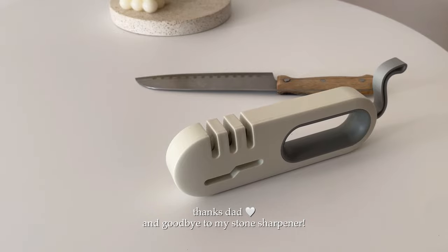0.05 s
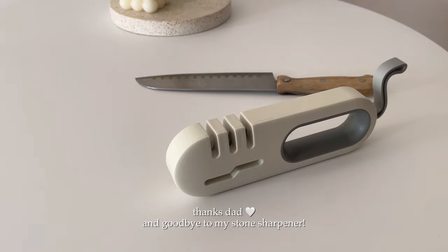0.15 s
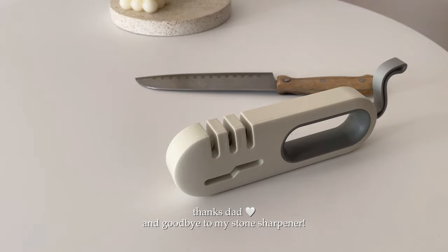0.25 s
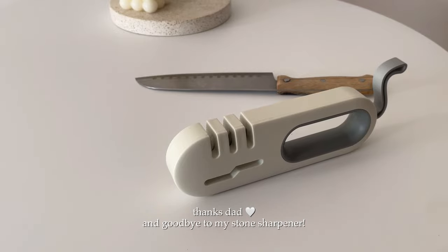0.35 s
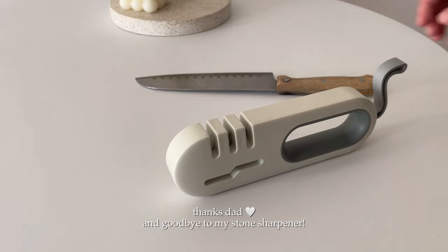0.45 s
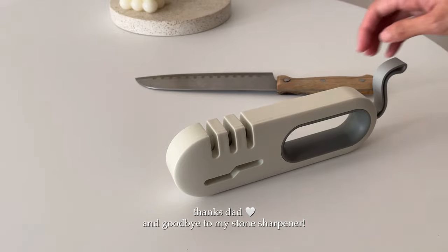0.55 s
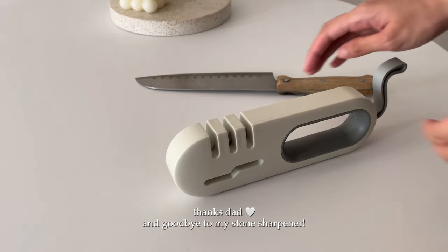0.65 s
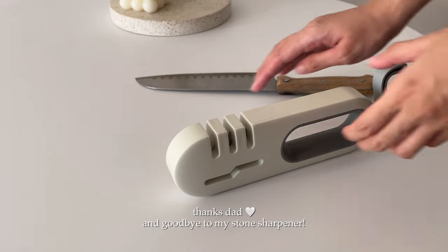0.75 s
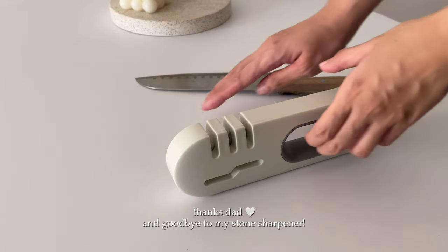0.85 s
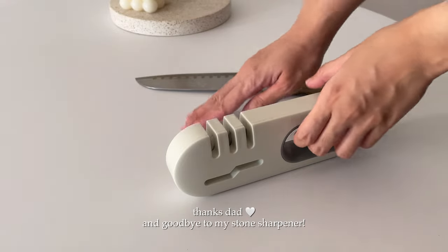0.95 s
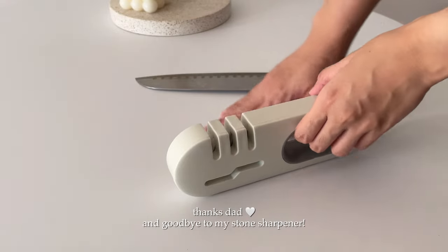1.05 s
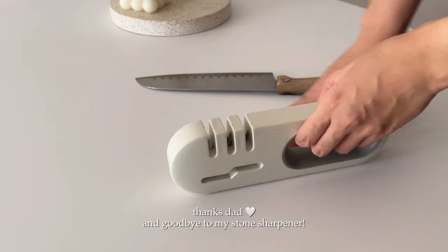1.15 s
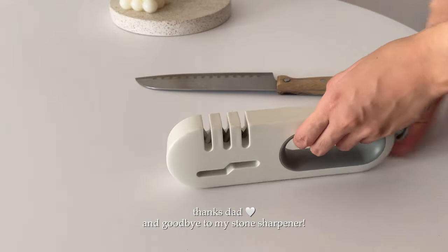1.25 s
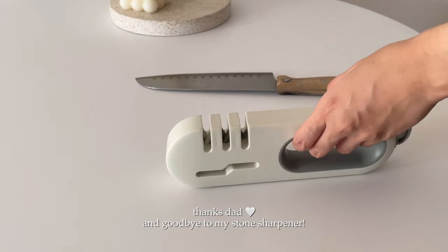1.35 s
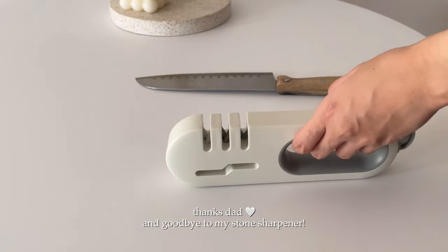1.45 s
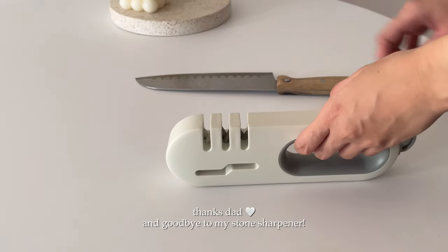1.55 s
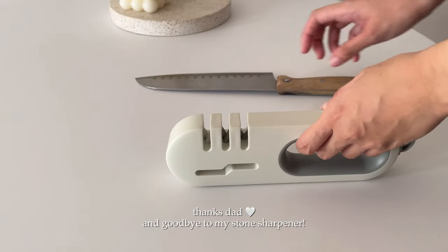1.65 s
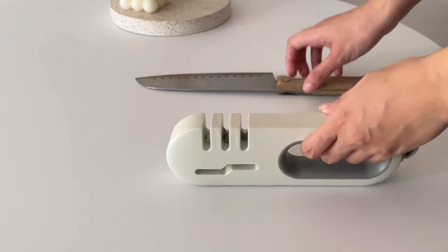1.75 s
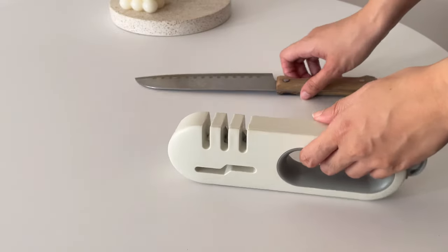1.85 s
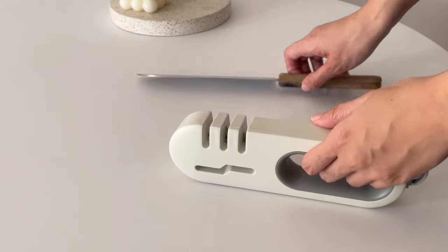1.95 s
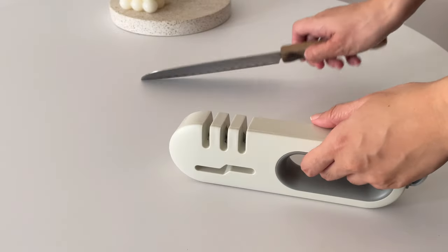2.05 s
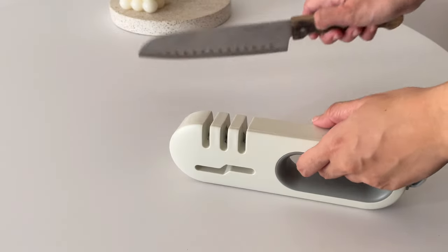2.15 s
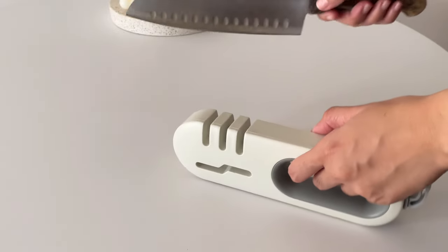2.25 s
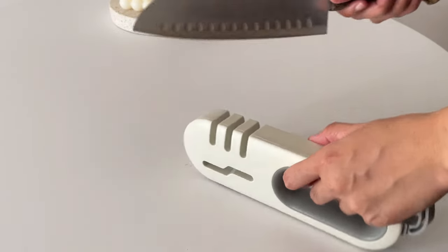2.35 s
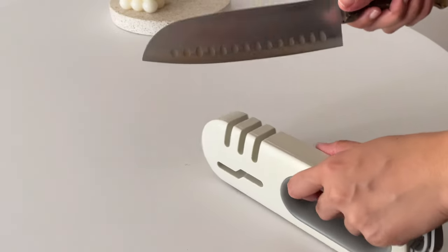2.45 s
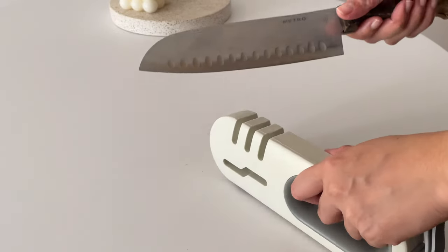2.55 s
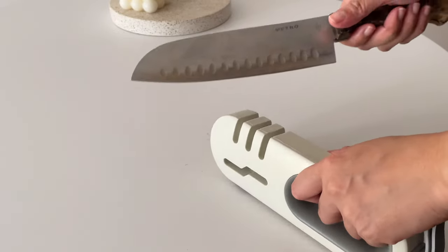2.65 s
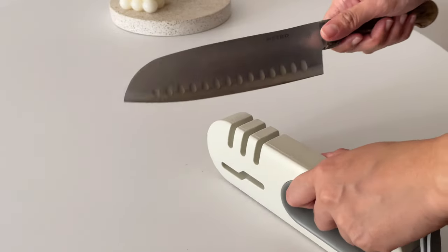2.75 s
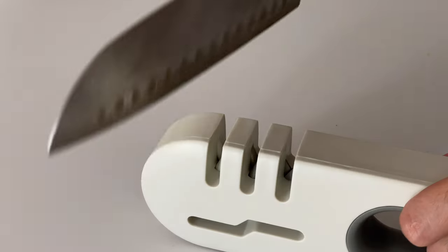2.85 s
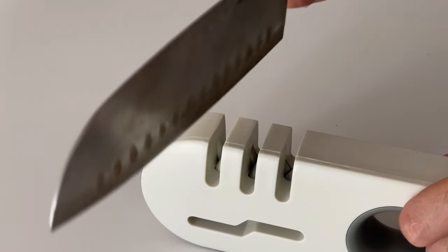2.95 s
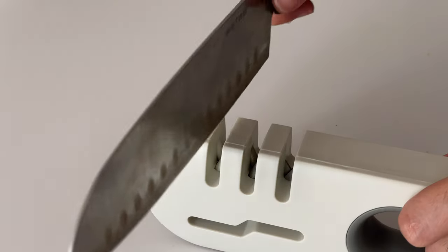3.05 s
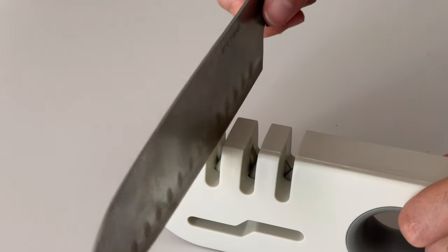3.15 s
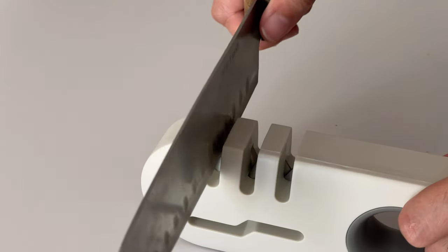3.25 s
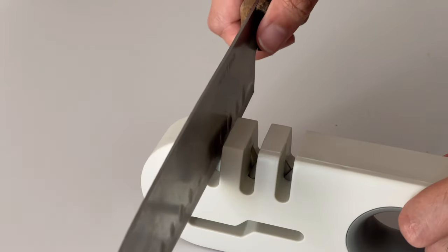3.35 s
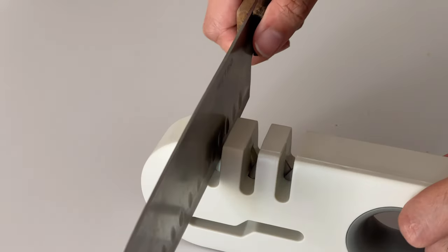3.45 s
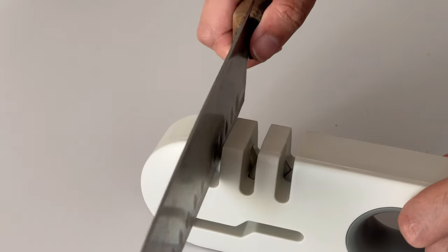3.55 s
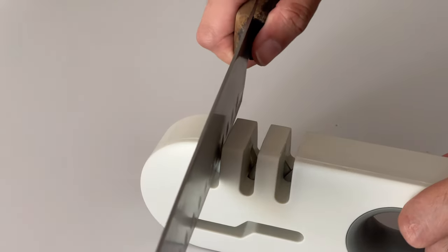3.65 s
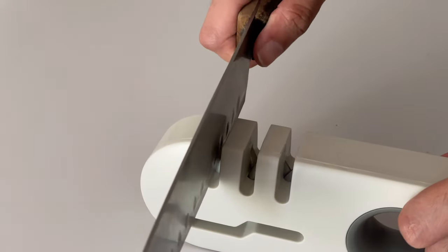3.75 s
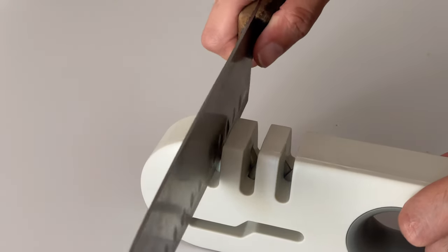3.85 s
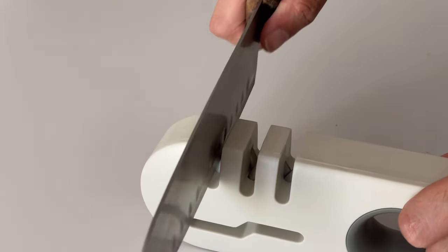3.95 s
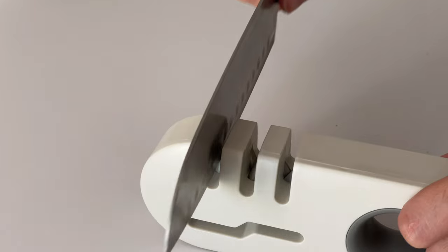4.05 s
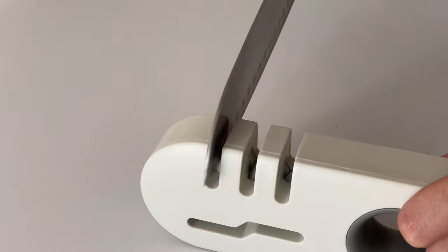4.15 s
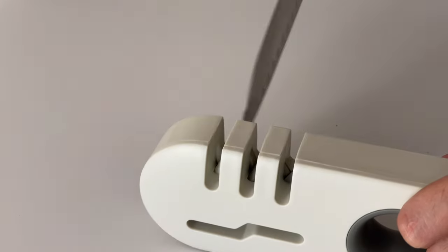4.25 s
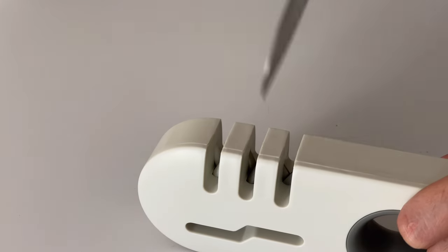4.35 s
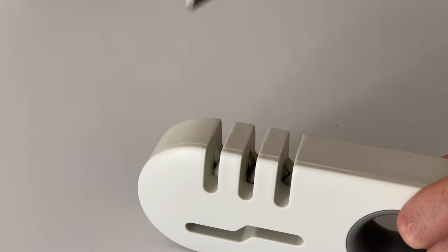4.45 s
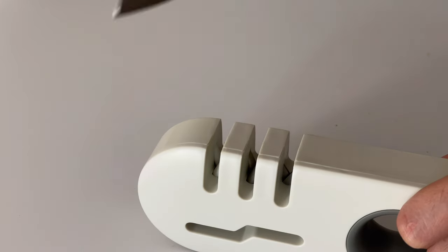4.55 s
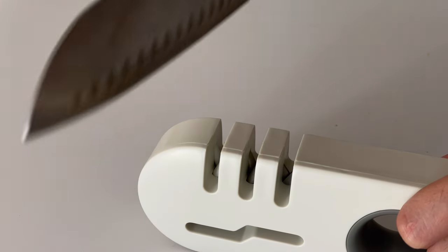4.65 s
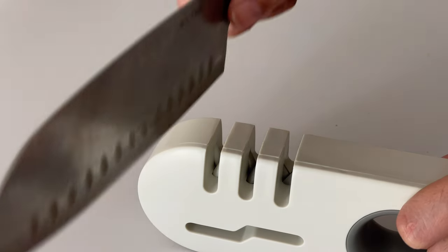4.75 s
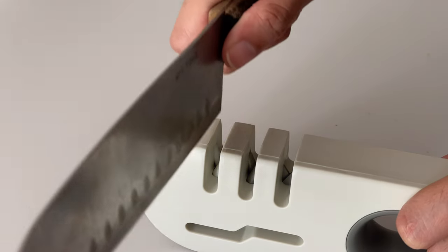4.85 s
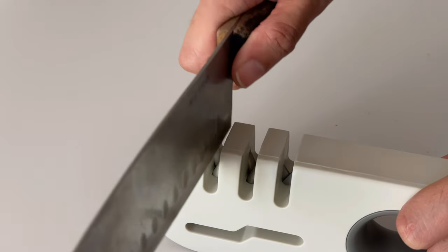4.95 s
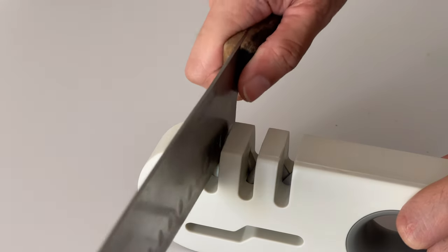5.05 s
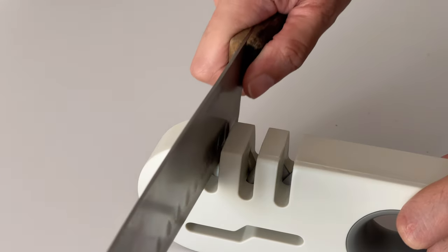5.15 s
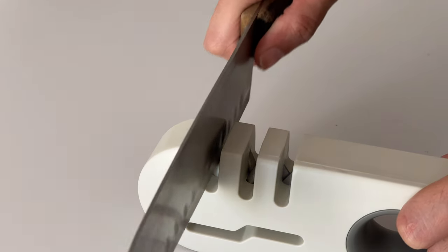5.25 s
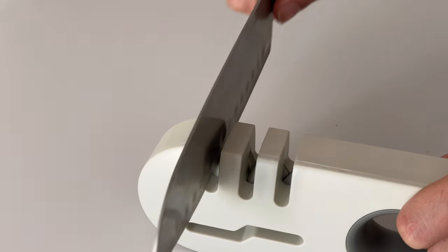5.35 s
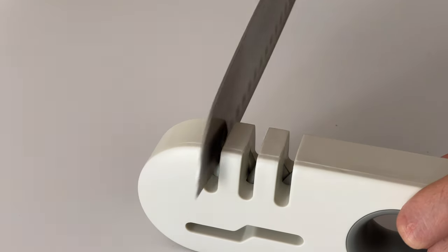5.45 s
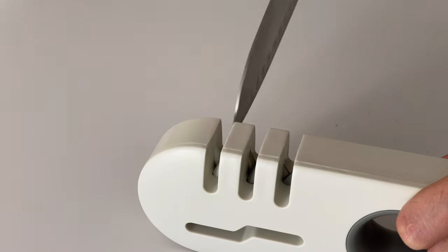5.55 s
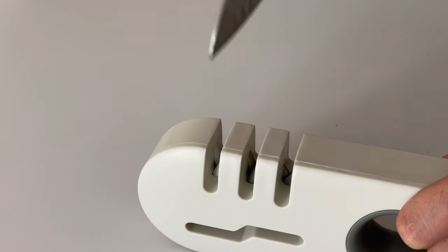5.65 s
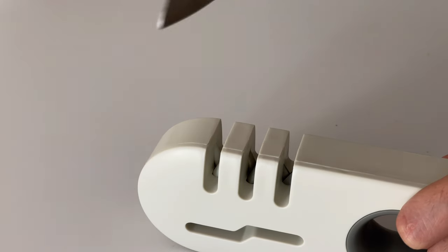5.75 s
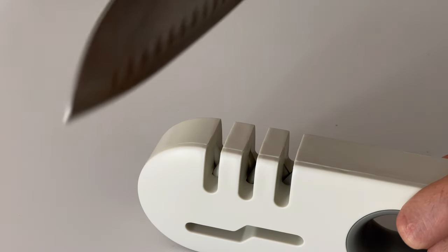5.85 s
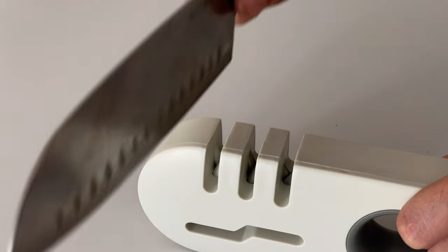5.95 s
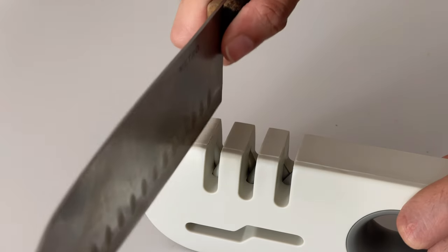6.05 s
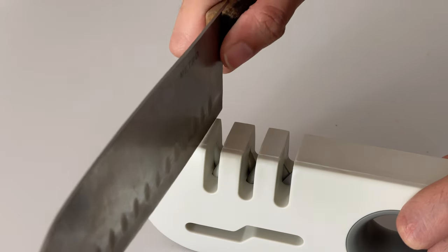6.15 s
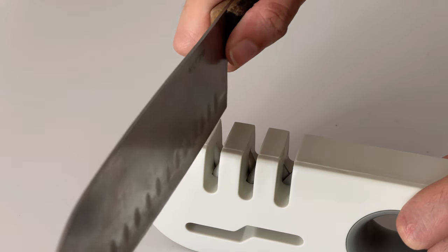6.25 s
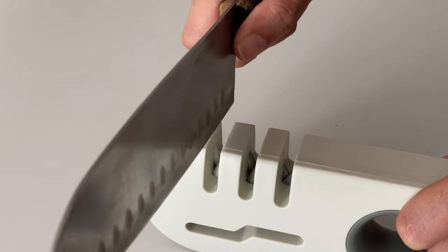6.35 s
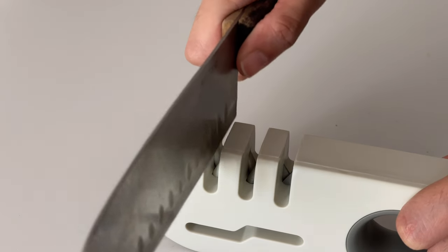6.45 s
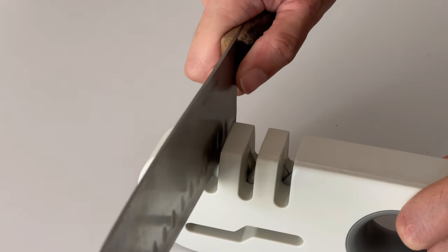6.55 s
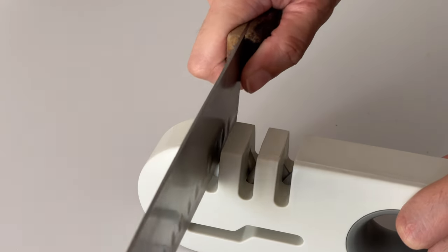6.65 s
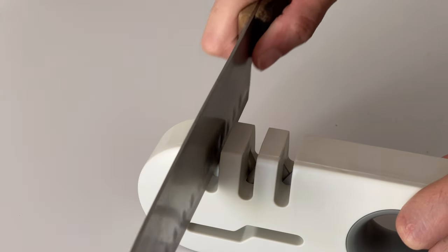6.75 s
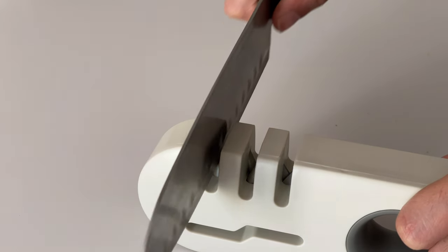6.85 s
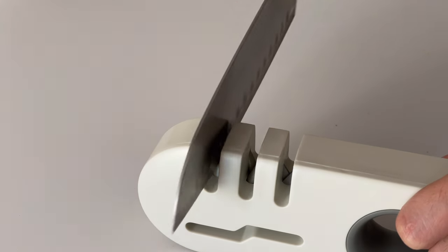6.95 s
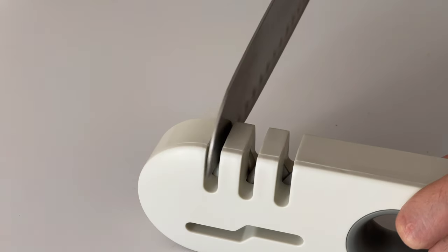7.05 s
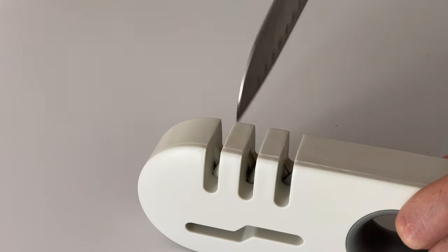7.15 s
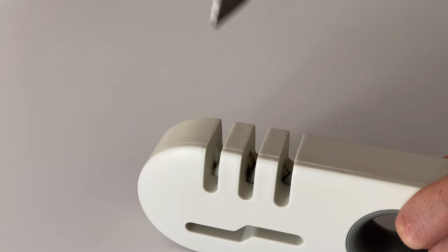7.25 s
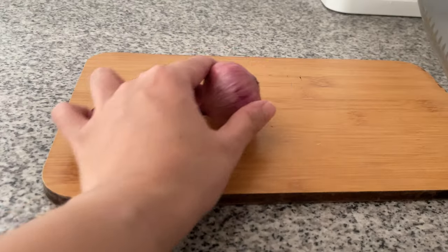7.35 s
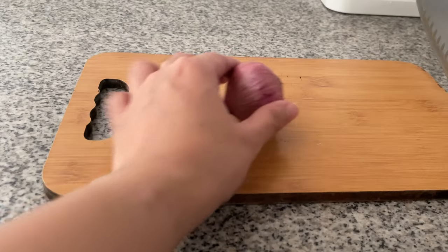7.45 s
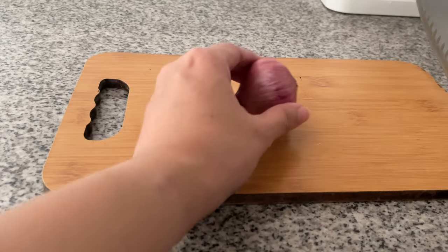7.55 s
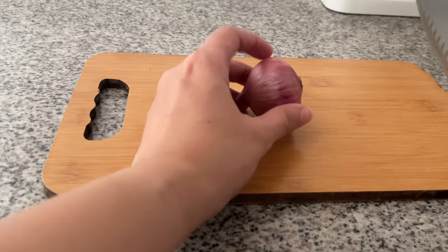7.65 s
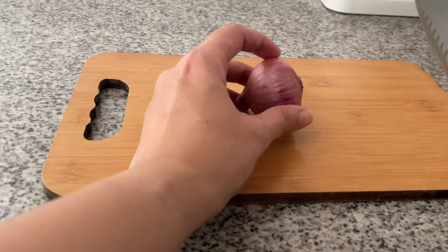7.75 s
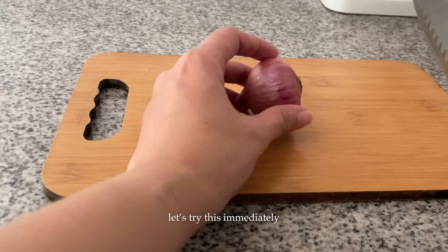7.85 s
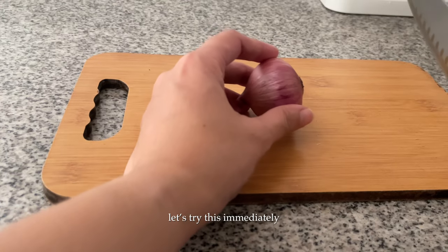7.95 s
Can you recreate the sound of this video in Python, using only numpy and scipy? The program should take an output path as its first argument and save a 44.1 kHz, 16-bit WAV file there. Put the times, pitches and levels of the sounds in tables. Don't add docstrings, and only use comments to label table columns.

```python
import sys
import numpy as np
from scipy import signal
from scipy.fft import rfft, irfft, next_fast_len
from scipy.io import wavfile
from scipy.ndimage import uniform_filter1d, map_coordinates

SR = 44100
rng = np.random.default_rng(int(sys.argv[2]) if len(sys.argv) > 2 else 0)


def transcribe(signal):
    frames = np.atleast_2d(signal).T
    limited = np.clip(frames, -1, 1)
    pcm = np.round(limited * 32767).astype(np.int16)
    wavfile.write(sys.argv[1], SR, pcm)


def convert_level_to_amplitude(level_db):
    exponent = np.asarray(level_db, float) / 20
    return 10 ** exponent


N = 353108

# f/Hz, width/Hz, level/dB
BLADE = [(1940, 57, -1), (2290, 205, -9), (3062, 130, 1.5), (4900, 76, -11), (5180, 140, -5.5),
         (5250, 64, -13.5), (7100, 18, -18), (8680, 110, -30), (11760, 210, -0.5), (12750, 810, -8.5),
         (13600, 150, -13.5), (14080, 400, -13.5)]
# f/Hz, level/dB
GRIT = [(500, -21), (1000, -17), (2000, -16), (4000, -10), (6500, -12.5), (9000, -7.5), (12500, -14.5),
        (15500, -20)]
# f/Hz, width/Hz, level/dB
TABLE = [(164.6, 8.8, -6), (227.3, 21.8, -0.5), (264.3, 15.6, 1), (316, 8.4, -4.5), (454, 130, -13.5),
         (620, 34, -11.5)]
# f/Hz, width/Hz, level/dB
HOUSING = [(920, 170, -5.5), (1180, 100, -4), (1520, 120, -2.5), (2420, 160, -4), (2820, 160, -9.5),
           (3660, 260, -12)]
FREE_LENGTH = (4060, 240)
HEEL = (1506, 63)


def strokes():
    scrape_db, thrum_db, ring_db, hiss_db, tip_db = contact()
    grit = reshaped(friction(grain_db=1.0, clump_db=2.5), patches(depth_db=2.0))
    grit = grit / np.sqrt(uniform_filter1d(grit ** 2, size=1800) + 1e-9)
    scrape_db = np.minimum(scrape_db, -40)
    heel_db, free_db = slot_grip()
    force = convert_level_to_amplitude(scrape_db + snags()) * unit(grit)

    body = lambda f: -0.71 * modes(BLADE)(f) + shape(GRIT)(f)
    treble = lambda f: 1 / (1 + (8800 / (f + 1)) ** 8)
    low = filtered(force, lambda f: body(f) * (1 - treble(f)))
    high = filtered(force * convert_level_to_amplitude(hiss_db + 8.5), lambda f: body(f) * treble(f))

    heel = filtered(force * convert_level_to_amplitude(heel_db - 0.5 + 1.3 * wobble(18)), modes([(*HEEL, 0)]))
    ring = filtered(force * convert_level_to_amplitude(2 * ring_db + 2.0 + 0.96 * wobble(26)), modes([(*FREE_LENGTH, 0)]))
    tip_gain_db = 0.82 * (scrape_db + 44.0) + 0.66 * ring_db - 1.5 + tip_db + free_db
    tip = filtered(force * convert_level_to_amplitude(tip_gain_db), modes([(5140, 300, 0.0024)]))
    plastic = filtered(force * convert_level_to_amplitude(np.minimum(-1.2 * ring_db - 22.5, -2)), modes(HOUSING[3:]))
    thrum_db = np.minimum(thrum_db, 2.5 - .6 * (scrape_db + 44.5))
    thrum = filtered(force * convert_level_to_amplitude(thrum_db + 12.5), lambda f: modes(TABLE)(f) / (1 + 1j * f / 400))
    return convert_level_to_amplitude(15.0) * (low + heel + ring + tip + plastic + high + thrum)


# t/s, pressure level/dB
PULLS = [
    [(3.808, -77), (3.846, -70.5), (3.914, -54), (4.09, -47), (4.17, -45), (4.215, -43), (4.229, -39.5)],
    [(5.1, -66), (5.13, -69), (5.158, -50.5), (5.208, -53), (5.33, -49), (5.478, -47.5), (5.488, -44.5),
     (5.532, -46.5), (5.56, -85)],
    [(6.601, -80), (6.625, -74), (6.669, -55.5), (6.75, -52.5), (6.88, -50), (6.92, -49), (7.05, -49),
     (7.11, -48.5), (7.125, -63)],
]
# t/s, bite level/dB, skid level/dB, skid length/s, ring level/dB
SEATS = [
    (3.29, -49.5, -65, 0.15, -18),
    (3.46, -70, -71, 0.098, -17),
    (3.667, -86, -77, 0.057, -20.5),
    (5, -59.5, -70, 0.0086, -30),
    (5.02, -44.5, -50, .047, -14),
    (5.0682, -51, -59, 0.02, -10),
    (5.146, -56, -60, .004, 0),
    (6.506, -47, -55.5, 0.04, -21),
    (6.561, -58, -68, 0.013, -20),
]
BITE_T60_S, LIFT_T60_S, SEAT_THRUM_DB, SEAT_HISS_DB = 0.12, 0.095, -7, -20
PULL_THRUM_DB, PULL_RING_DB, PULL_HISS_DB = [-4.5, -4, -2], [-3, -5, -8.5], [-7.5, -7.5, -9]
PULL_TIP_DB = [0, 3.5, 8.5]
TIP_RING_DB = [1, -0.5, 3]
ENDS_RING_DB, ENDS_HISS_DB, ENDS_THRUM_DB = 3.5, -5.5, -5
LIGHT_DB, TIP_FREES = -54, 1.3


def contact():
    t = np.arange(N) / SR
    scrape_db, = curves(PULLS)
    pull = np.searchsorted([rows[0][0] for rows in PULLS[1:]], t)
    end_times = [rows[k][0] for rows in PULLS for k in (1, -1)]
    along_pull = np.interp(t, end_times, [-1, 1] * len(PULLS))
    ends = along_pull ** 2
    by_pull = np.array([PULL_THRUM_DB, PULL_RING_DB, PULL_HISS_DB, PULL_TIP_DB], float)
    thrum_db, ring_db, hiss_db, tip_db = by_pull[:, pull]
    thrum_db = thrum_db + ENDS_THRUM_DB * ends
    ring_db = ring_db + ends * np.where(along_pull < 0, ENDS_RING_DB, np.take(TIP_RING_DB, pull))
    hiss_db = hiss_db + ENDS_HISS_DB * ends
    for s, bite_db, skid_db, length, damped_db in SEATS:
        since = t - s
        level = np.maximum(bite_db - 60 * since / BITE_T60_S, skid_db)
        level = level - 60 * np.clip(since - length, 0, None) / LIFT_T60_S
        on = (since >= 0) & (level > scrape_db)
        scrape_db[on] = level[on]
        thrum_db[on], ring_db[on], hiss_db[on] = SEAT_THRUM_DB, damped_db, SEAT_HISS_DB
        tip_db[on] = TIP_FREES * max(LIGHT_DB - skid_db, 0)
    return scrape_db, thrum_db, ring_db, hiss_db, tip_db


# t/s, extra level/dB
CATCHES = [(3.92, 3), (3.953, -2), (3.995, 8.5), (4.065, -1), (4.087, 6), (4.143, 2.9), (4.221, 3),
           (5.19, 6.5), (5.234, 2), (5.252, 2), (5.264, 4.5), (5.49, 4.1), (5.502, 5), (6.674, 7),
           (6.758, 2), (6.812, 1), (6.913, 3.5), (7.066, 0.5), (7.101, 9.5),
           (3.29, 6.5),
    (5.0694, 12),
    (5.158, 3),
    (5.523, 4.5),
    (6.508, 2),
    (6.563, 9),
    (7.109, 6),
]
CATCH_S = .003


def snags():
    t = np.arange(N) / SR
    snag_db = np.zeros(N)
    for s, db in CATCHES:
        near = slice(round((s - .02) * SR), round((s + .02) * SR))
        snag_db[near] += db * np.exp(-((t[near] - s) / CATCH_S) ** 2)
    return snag_db


# from t/s, to t/s, lowest mode level/dB, higher mode level/dB
HEEL_FREE = [(3.306, 3.443, 5.5, 2), (3.443, 3.8, 4, 5), (5.0, 5.018, 10, 2), (5.02, 5.056, 6, -3),
             (5.051, 5.068, 10.5, -5), (5.155, 5.175, 0, -6), (5.175, 5.275, 2, 5.5), (5.49, 5.56, -5, 2.5),
             (6.509, 6.551, 11.5, -3), (6.674, 6.868, -3, 5), (6.897, 6.957, -4, 0),
             (7.08, 7.12, -3.5, 2.5)]


def slot_grip():
    heel_db, free_db = np.zeros((2, N))
    for start, end, low_db, high_db in HEEL_FREE:
        held = slice(round(start * SR), round(end * SR))
        heel_db[held], free_db[held] = low_db, high_db
    return heel_db, free_db


# t/s, peak level/dB, then thud, boom and snap level/dB relative to the peak
KNOCKS = [(1.1896, -57.5, 13.5, 14, -7), (3.287, -64, -39, -39, 18.5), (4.2315, -14, -2.5, -21, -14.5),
          (4.9998, -54.5, 3.5, -20, -13), (5.0212, -51.5, -10, -20, -12), (5.0711, -33, -2.5, -5, -9),
          (5.144, -55.5, -11, -2, -13.5), (6.0972, -37, 0, -3, -24), (6.1003, -42.5, -5.5, -7, -24),
          (6.104, -46.5, 2.5, -12, -26), (6.5079, -42.5, 5.5, -22, 2), (6.564, -32, -5.5, -9.5, -9),
          (7.0985, -62, -14, -25, 15), (7.1267, -39.5, 6.5, -9, -7), (7.129, -39.5, -18, -17, -15)]
# t/s, peak level/dB, snap level/dB
TICKS = [(0.084, -67, -17), (2.7511, -50.5, -29), (2.818, -54, -13), (3.409, -54, -16), (3.436, -54, -11),
         (3.5448, -60.5, 1), (3.6681, -65.5, -10), (3.6939, -65.5, -9), (3.713, -68, -6),
         (3.8108, -60, -4.5), (3.8302, -59.5, -5.5), (4.927, -72, -6), (6.4252, -67, -9), (7.328, -64, -4),
         (7.9158, -67.5, 3)]
TICK_THUD_DB, TICK_BOOM_DB = -3, -10
# f/Hz, width/Hz, level/dB
TABLE_LOW = [(60, 17, -9.5), (110.8, 7.7, -1.5)]
HARD_DB, DAMPING = -36.5, 0.1
SOFTER = .5


def knocks():
    t = np.arange(600) / SR
    hits = np.zeros((6, N + len(t)))
    late = np.clip(t - .0015, 0, None) / 0.00049
    push = late * np.exp(1 - late)
    touches = [(s, db, TICK_THUD_DB, TICK_BOOM_DB, snap_db) for s, db, snap_db in TICKS]
    blows = [*KNOCKS, *touches]
    noises = rng.standard_normal((len(blows), len(t)))
    for (s, db, thud_db, boom_db, snap_db), noise in zip(blows, noises):
        contacts = convert_level_to_amplitude(db - 60 * t / 0.0091) * noise
        hits[:, round(s * SR):][:, :len(t)] += [
            contacts,
            contacts * convert_level_to_amplitude(-DAMPING * max(db - HARD_DB, 0)),
            push * convert_level_to_amplitude(db + thud_db),
            push * convert_level_to_amplitude(db + boom_db),
            contacts * convert_level_to_amplitude(snap_db),
            contacts * convert_level_to_amplitude(snap_db + SOFTER * min(snap_db + 6.0, 0))]
    rattle, pressed, thud, boom, snap, snap_top = hits[:, :N]

    soft = lambda f: (1 + 1j * f / 5000) ** 4
    click = filtered(rattle, lambda f: 0.5 * modes([(1800, 2000, 0)])(f) / soft(f))
    click = click + filtered(pressed, lambda f: modes(HOUSING)(f) / soft(f))
    snap = filtered(snap, modes([(5000, 4000, 0.5)])) - filtered(snap_top, modes([(11900, 6400, -3)]))
    thud = filtered(thud, modes([*TABLE, (520, 400, -17)]))
    boom = filtered(boom, modes(TABLE_LOW))
    return convert_level_to_amplitude(16.0) * click + convert_level_to_amplitude(15.0) * thud - convert_level_to_amplitude(22.5) * boom + convert_level_to_amplitude(12.0) * snap


# t/s, hold/s, fade/s, level/dB
DRAGS = [
    [(1.0, 0.088, .05, -79), (1.1, 0.045, 0.13, -62), (1.39, 0.11, .05, -57.5), (1.495, 0.018, .04, -57),
     (1.545, 0.027, .03, -56.5), (1.6, 0.054, 0.097, -55.5)],
    [(1.782, .018, 0.02, -36.5), (1.808, 0.014, 0.026, -40), (1.84, 0.025, 0.08, -51)],
    [(1.9, 0.047, 0.05, -47), (1.96, 0.065, 0.03, -45.5)],
    [(2.035, 0.018, .02, -49), (2.055, 0.016, 0.03, -40.5)],
    [(2.075, 0.03, 0.036, -48.5), (2.12, .02, 0.1, -54.5)],
]
# f/Hz, width/Hz, level/dB
WOOD = [
    [(1022, 29, 0.5), (1247, 27, -6.5)],
    [(210, 24, 0.5), (317, 19.5, 7), (441, 36, 0), (755, 32, -2), (1060, 85, -12), (1290, 62, -37),
     (1730, 45, -14), (2080, 50, -7), (2550, 90, -17), (3620, 66, -12)],
    [(279, 14, 11.5), (440, 32, -4), (713, 36, -4), (960, 65, -7), (1750, 50, -37)],
    [(243, 40, -5), (420, 36, 5.5), (727, 8.6, 7.5), (960, 50, -14), (1730, 35, -6.5), (2370, 39, -5),
     (3640, 39, -15)],
    [(244, 38, -3), (470, 62, -1), (634, 41, -4), (1040, 35, -5), (1166, 21, 1.5)],
]
# t/s, level over the friction/dB
BUMPS = [(1.778, 24), (1.7872, 27.5), (1.809, 28), (1.965, 27), (2.036, 27), (2.057, 28.5), (2.074, 29.5),
         (2.12, 18)]


def drags():
    def body(wood):
        dull = modes([(400, 700, 0)])
        return lambda f: (modes(wood)(f) + 0.17 * dull(f)) / (1 + (f / 4200) ** 4)

    lumps = friction(grain_db=1.5, clump_db=2.5)
    for s, db in BUMPS:
        lumps[round(s * SR)] += convert_level_to_amplitude(db)
    return sum(convert_level_to_amplitude(-4.5) * gestures(rows) * unit(filtered(lumps, body(wood)))
               for rows, wood in zip(DRAGS, WOOD))


# t/s, hold/s, fade/s, rub level/dB, hiss relative level/dB
RUBS = [(0.33, 0.0089, 0.13, -59.5, -3), (0.499, .005, 0.036, -60, -13), (0.508, 0.23, 0.21, -66, 7.5),
        (1.45, 0.04, .05, -69, -7), (1.492, .03, 0.076, -71.5, 3), (1.495, 0.041, 0.45, -79, -4),
        (1.774, 0.0072, 0.19, -56.5, -8), (1.92, 0.14, .1, -73.5, 0.5), (2.052, .012, 0.089, -59, -4.5),
        (2.18, 0.12, 0.082, -67, -1), (2.316, .18, .04, -71.5, 7.5), (2.322, 0.24, 0.14, -68.5, -7),
        (2.752, .005, 0.043, -67, -5), (2.818, .005, 0.0065, -71, -3), (2.84, 0.12, 0.076, -83, -9),
        (7.335, .004, 0.036, -63.5, -1), (7.37, 0.11, .2, -71.5, 4.5), (7.498, 0.095, .04, -80, 7),
        (7.602, 0.36, .1, -86.5, -12), (7.937, 0.071, .02, -80, 1)]
# f/Hz, level/dB
RUB_COLOUR = [(700, -15.5), (1600, 3), (3000, 2), (5100, 1.5), (5600, -4), (6100, -0.5), (7000, 1),
              (7600, -12.5), (8200, -7), (9200, -27.5), (10500, -39)]
# f/Hz, level/dB
RUB_HISS = [(6500, -28.5), (8300, 0), (9200, -8), (9900, -3), (12000, 3.5), (15500, -3)]
# f/Hz, side minus mid level/dB
RUB_SIDE = [(1000, 8.5), (2000, -1.5), (3300, 2), (5600, -2), (9000, 7), (12500, -3.5), (13500, -21.5)]
# t/s, level/dB
SHOVE = [(.96, -97), (1.03, -65), (1.12, -53.5), (1.2, -48), (1.29, -43), (1.34, -44), (1.4, -57),
         (1.47, -74)]
# t/s, level/dB, resonance f/Hz
SLIDE = [
    [(1.04, -76, 1800), (1.09, -60, 1830), (1.18, -57, 1800), (1.21, -64, 2520), (1.25, -50.5, 4230),
     (1.3, -47.5, 4700), (1.37, -53.5, 4700), (1.45, -65, 5000)],
]
SHOVE_HISS_DB, HISS_FADES_DB_PER_S = -1, 95


def rubs():
    shove_db, = curves([SHOVE])
    past = np.clip(np.arange(N) - np.argmax(shove_db), 0, None) / SR
    rest = convert_level_to_amplitude(per_shot([row[2] for row in SHOTS]))
    rub = gestures([row[:4] for row in RUBS]) + convert_level_to_amplitude(shove_db) + rest
    hiss = gestures([(*row[:3], row[3] + row[4]) for row in RUBS])
    hiss = hiss + convert_level_to_amplitude(shove_db + SHOVE_HISS_DB - HISS_FADES_DB_PER_S * past) + convert_level_to_amplitude(-4.5) * rest

    gap_db, gap_hz = curves(SLIDE)
    open_hz = gap_hz * (gap_db > -100)
    centre = lambda t: np.interp(t * SR, np.arange(N), open_hz) + 2.5

    def resonance(hz, t):
        width = 20 + 60 * (centre(t) / 1850) ** 2.9
        return 30 / np.sqrt(width) / (1 + ((hz - centre(t)) / width) ** 2)

    def thinned(hz, t):
        return patches(depth_db=1.6)(hz, t) / np.sqrt(1 + (0.66 * centre(t) / (hz + 1)) ** 6)

    gap = convert_level_to_amplitude(gap_db + 8.5) * reshaped(wide(np.ones_like, RUB_SIDE), resonance)
    skin = rub * wide(shape(RUB_COLOUR), RUB_SIDE) + hiss * wide(shape(RUB_HISS), RUB_SIDE)
    return gap + convert_level_to_amplitude(-4.5 + 0.72 * wobble(25)) * reshaped(skin, thinned)


# t/s, hold/s, fade/s, level/dB
PUFFS = [
    (1.03, 0.072, 0.09, -56),
    (1.17, 0.043, 0.052, -49),
    (1.33, 0.095, .08, -54),
    (1.55, 0.11, .08, -65),
    (2.05, .05, 0.087, -61),
    (7.34, .05, .08, -56),
]


def puffs():
    colour = shape([(25, -5), (60, -1), (130, -9), (300, -35), (600, -92)])
    air = filtered(rng.standard_normal((2, N)), colour)
    return gestures(PUFFS) * convert_level_to_amplitude(4.6 * wobble(14.05)) * unit(air)


# f/Hz, phase/rad
PORTS = [(0, -.1), (1000, -.25), (1400, 0), (2750, 0), (3050, -.55), (4500, -.75), (6400, -1.4),
         (7900, -2.15), (8400, -3.0), (9150, -3.3), (9800, -4), (12700, -5.5), (13300, -6.28)]


def ports(x):
    f, lead = np.transpose(PORTS)
    sides = [1, -1]

    def response(hz):
        phase = np.exp(.5j * np.outer(sides, np.interp(hz, f, lead)))
        return phase * convert_level_to_amplitude(np.outer(sides, 0.59 / (1 + hz / 400)))
    return filtered(x, response)


# f/Hz, T60/s
WALLS = [(100, 0.5), (300, 0.46), (1000, 0.25), (3000, 0.26), (12000, 0.3)]
# f/Hz, level/dB
WALLS_SIDE = [(100, -19.5), (300, -10), (700, -1), (1500, -16), (4000, -13)]


def walls(x):
    out, step = np.zeros((2, N + 2 * SR)), SR // 3
    for start in range(0, N, step):
        hz, t, z = signal.stft(rng.standard_normal((2, SR // 2)), SR, nperseg=256)
        fall_db = -60 * t / along(WALLS, hz)[:, None]
        decay = convert_level_to_amplitude(fall_db) + convert_level_to_amplitude(0.52 * fall_db - 14.5)
        apart = z[1] * convert_level_to_amplitude(along(WALLS_SIDE, hz))[:, None]
        tail = signal.istft([z[0] + apart, z[0] - apart] * decay, SR, nperseg=256)[1]
        wet = signal.fftconvolve(x[:, start:start + step], tail / np.linalg.norm(tail[0]), axes=1)
        out[:, start + 200:][:, :wet.shape[1]] += wet
    return out[:, :N]


# f/Hz, level/dB
AIR_WIDE = [(70, -13), (100, -1.5), (160, 6), (250, -2), (365, -6), (1100, -15.5), (2200, -23.5),
            (4400, -33), (6000, -44), (10600, -58), (11900, -39), (13000, -69), (14500, -86)]
# f/Hz, level/dB
AIR_CLOSE = [(70, -40.5), (100, 1), (165, -6), (235, -5.5), (440, -15.5), (700, -20.5), (1100, -23.5),
             (3900, -40.5), (6000, -56.5), (11500, -60.5), (11900, -40), (12300, -58), (14000, -92)]
# f/Hz, level/dB
AIR_BOARD = [(70, -24), (100, 2.5), (180, -6), (265, 0), (430, -10.5), (1100, -18.5), (1500, -26),
             (3000, -38), (6000, -51.5), (11000, -52), (11900, -35), (13000, -56), (14500, -92.5)]
# f/Hz, side minus mid level/dB
AIR_SIDE = [(60, -13), (200, -11), (380, -2), (700, 3), (1300, 0), (2200, -6), (4400, -6), (8000, 5),
            (12500, -3.5), (13500, -27.5)]
# f/Hz, width/Hz, level/dB
HUM = [(59.4, 7, 1.5), (116, 16, -8), (157.2, 3.4, -1)]
# t/s, level/dB; the level dips briefly at 6.3 s
HUM_LEVEL = [
    [(0.0, -57.5), (0.74, -59), (1.86, -53), (2.11, -59), (2.58, -55.5), (2.83, -59.5)],
    [(2.83, -63), (3.32, -65), (4.03, -63), (6.06, -64), (6.33, -70), (7.32, -62)],
    [(7.323, -61), (7.375, -63), (7.645, -60.5), (7.777, -54), (7.913, -59), (8.007, -57)],
]
HUM_DRIFT = [.13, .03, .04]
SHAKE_DB, SHAKE_FADE_S, PULL_SHAKE_DB = -24.5, 0.23, -9


def room_tone():
    hum_db, = curves(HUM_LEVEL)
    shake = gestures([(s, .01, SHAKE_FADE_S, db + SHAKE_DB) for s, db, *_ in KNOCKS])
    shake = shake + convert_level_to_amplitude(curves(PULLS)[0] + PULL_SHAKE_DB)
    air = per_shot([wide(shape(colour), AIR_SIDE) for colour in (AIR_WIDE, AIR_CLOSE, AIR_BOARD)])
    still = convert_level_to_amplitude(per_shot([row[1] for row in SHOTS]))
    level = np.hypot(still, uniform_filter1d(shake, size=1500))

    phase = 2 * np.pi * np.cumsum(58 + 2.61 * wobble(6)) / SR
    drift = np.outer([1, -1], per_shot(HUM_DRIFT) * wobble(9.2))
    motor = np.sin(phase + drift) * convert_level_to_amplitude(1.3 * wobble(11))
    hum = motor + 0.38 * wide(lambda f: modes(HUM)(f) * (f < 300), [(60, -18.5)])
    return (convert_level_to_amplitude(hum_db + 6.0) * hum + level * convert_level_to_amplitude(-6.5 + 3.0 * wobble(9.9)) * air) * convert_level_to_amplitude([[1.1], [-1.1]])


# t/s, air level/dB, faint rustle level/dB
SHOTS = [
    (0.0, -49.5, -86),
    (2.828, -61.5, -94),
    (7.324, -50.5, -94),
]


def per_shot(values):
    return np.choose(np.searchsorted([row[0] for row in SHOTS[1:]], np.arange(N) / SR), values)


TOUCH_S, FADE_DB = .024, 22


def gestures(rows):
    s, hold, fade, db = np.transpose(rows)[..., None]
    t = np.arange(0, N, 16) / SR
    rise = np.clip(s - t, 0, None) / TOUCH_S
    fall = np.clip(t - s - hold, 0, None) / np.abs(fade)
    level = db - FADE_DB * (rise + fall)
    return np.interp(np.arange(N) / SR, t, np.linalg.norm(convert_level_to_amplitude(level), axis=0))


def friction(grain_db, clump_db):
    return convert_level_to_amplitude(grain_db * wobble(900) + clump_db * wobble(45)) * rng.standard_normal(N)


def modes(table):
    def response(f):
        return sum((-1) ** k * convert_level_to_amplitude(db) * 1j * f * w / (c * c - f * f + 1j * f * w)
                   for k, (c, w, db) in enumerate(table))
    return response


def shape(points):
    return lambda f: convert_level_to_amplitude(along(points, f))


def wide(response, side_db):
    mid, side = filtered(rng.standard_normal((2, N)),
                         lambda f: response(f) * convert_level_to_amplitude([0 * f, along(side_db, f)]))
    return np.array([mid + side, mid - side]) / np.std(mid)


def filtered(x, response):
    m = next_fast_len(N + SR // 2)
    return irfft(rfft(x, m) * response(np.fft.rfftfreq(m, 1 / SR)), m)[..., :N]


def reshaped(x, gain):
    hz, t, z = signal.stft(x, SR, nperseg=512)
    return signal.istft(z * gain(hz[:, None], t), SR, nperseg=512)[1][..., :N]


def patches(depth_db):
    def gain(hz, t):
        field = rng.standard_normal((len(hz), len(t)))
        field = uniform_filter1d(field, size=5, axis=0)
        return convert_level_to_amplitude(depth_db * unit(uniform_filter1d(field, size=9, axis=1)))
    return gain


def wobble(rate):
    return map_coordinates(rng.standard_normal(int(N * rate / SR) + 4), [np.arange(N) * rate / SR])


def curves(tables):
    t = np.arange(N) / SR
    s, *cols = np.transpose(np.vstack(tables))
    out = np.array([np.interp(t, s, c) for c in cols])
    inside = np.any([(t >= r[0][0]) & (t <= r[-1][0]) for r in tables], axis=0)
    out[0, ~inside] = -160
    return out


def along(points, hz):
    f, v = np.transpose(points)
    return np.interp(np.log(hz + 1), np.log(f + 1), v)


def unit(x):
    return x / np.sqrt(np.mean(x ** 2) + 1e-20)


HANDLE_LEAD = 9


def scene():
    knife = ports(strokes() + knocks())
    table = drags()
    handle = np.array([table, np.roll(table, HANDLE_LEAD)]) * convert_level_to_amplitude([[1.6], [-1.6]])
    near = knife + handle
    return near + convert_level_to_amplitude(-8.5) * walls(near) + rubs() + puffs() + room_tone()


def top_cut(x):
    return signal.sosfilt(signal.butter(12, 16510, fs=SR, output="sos"), x)


TOP_HZ = 15800


def record(dry):
    band = lambda hz: 1 / (1 + (hz / TOP_HZ) ** 120) / (1 + (24 / (hz + 1)) ** 4)
    mix = filtered(dry, band)
    return top_cut(mix)


dry = scene()
out = record(dry)
transcribe(out)
```